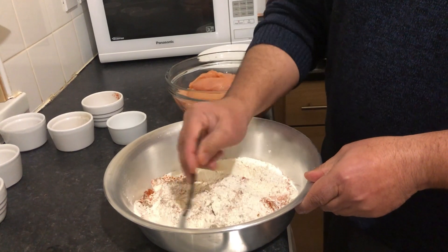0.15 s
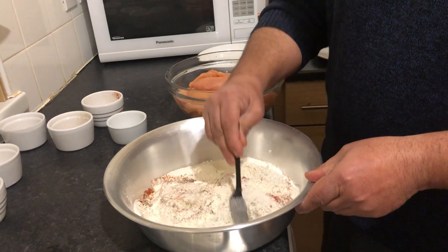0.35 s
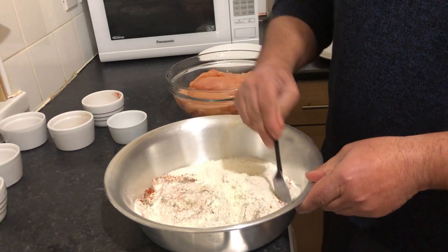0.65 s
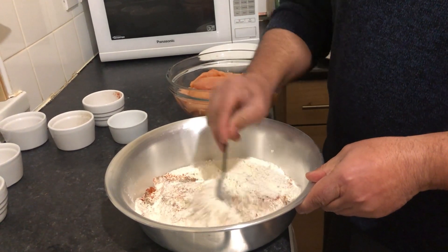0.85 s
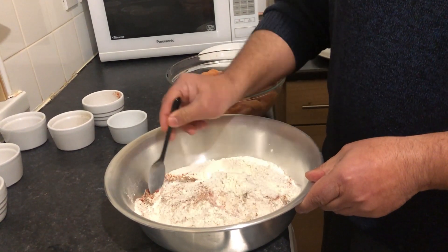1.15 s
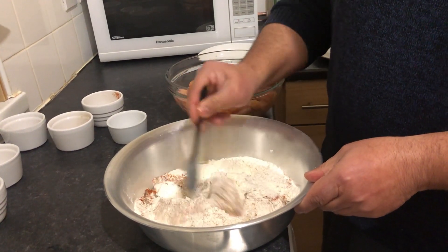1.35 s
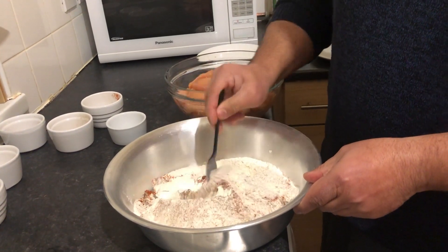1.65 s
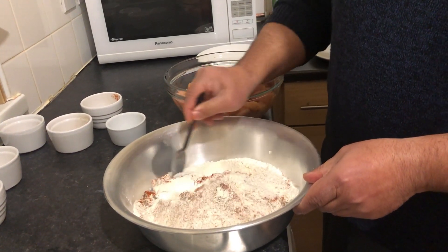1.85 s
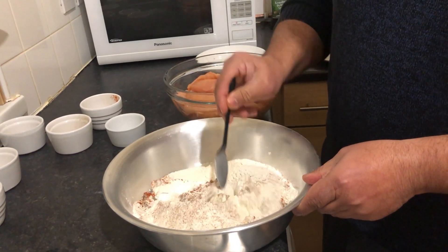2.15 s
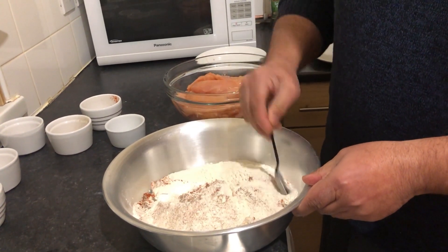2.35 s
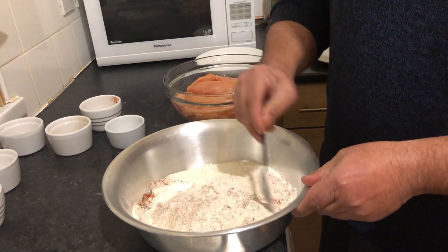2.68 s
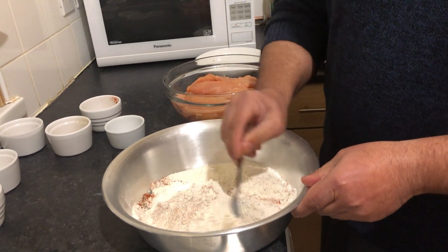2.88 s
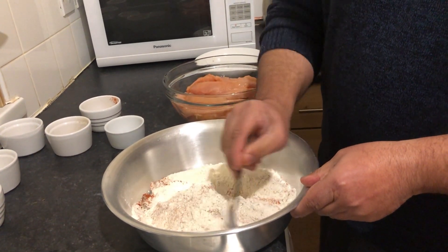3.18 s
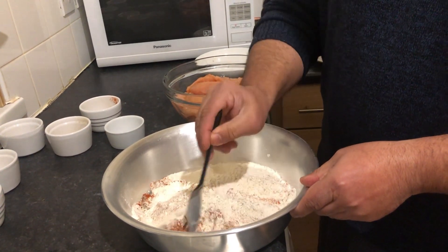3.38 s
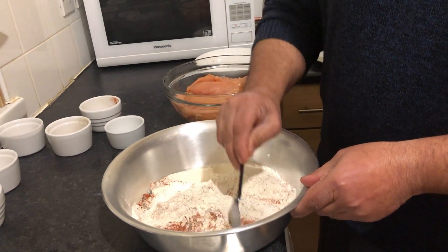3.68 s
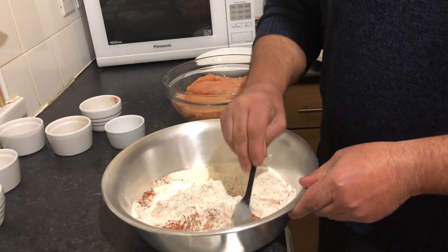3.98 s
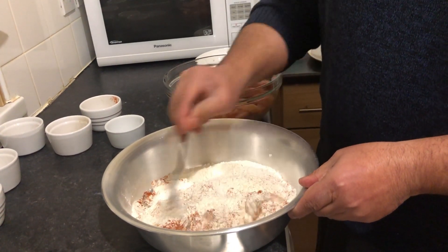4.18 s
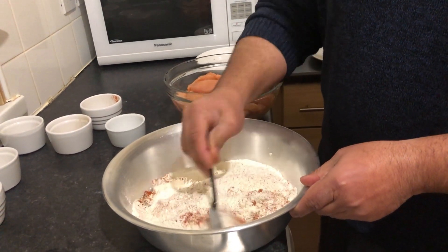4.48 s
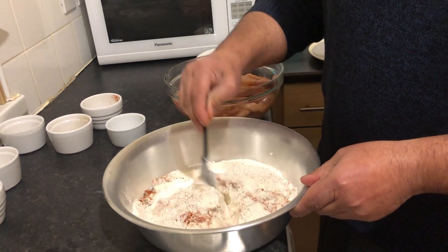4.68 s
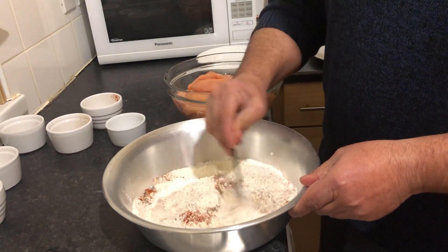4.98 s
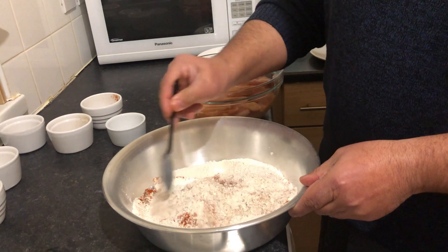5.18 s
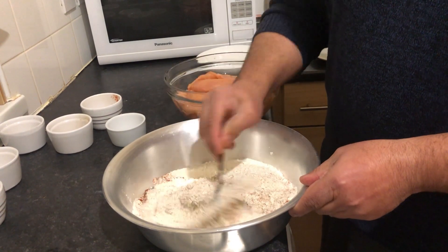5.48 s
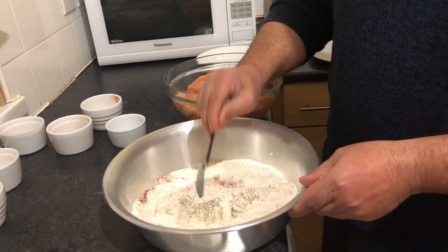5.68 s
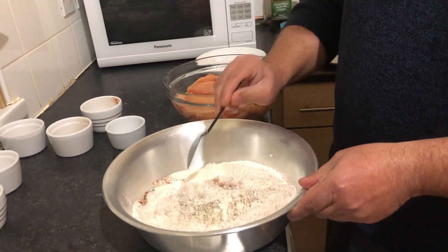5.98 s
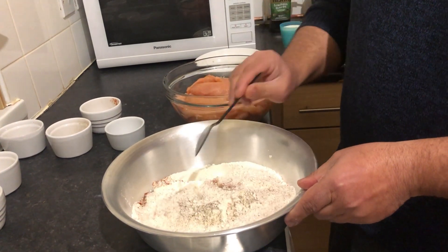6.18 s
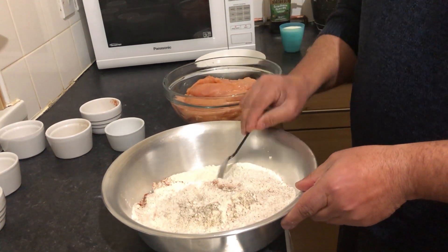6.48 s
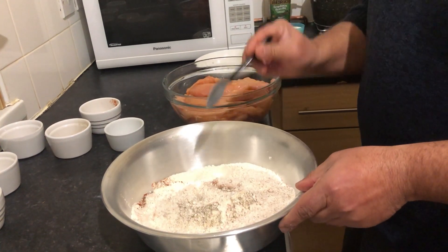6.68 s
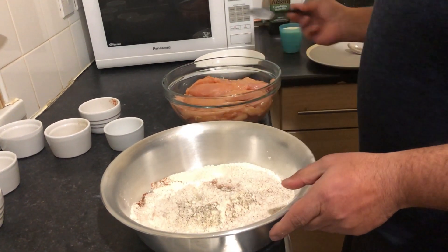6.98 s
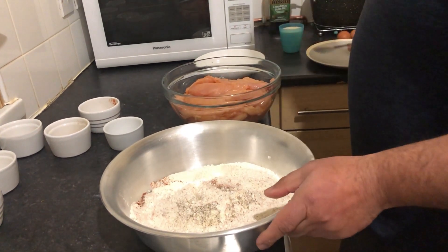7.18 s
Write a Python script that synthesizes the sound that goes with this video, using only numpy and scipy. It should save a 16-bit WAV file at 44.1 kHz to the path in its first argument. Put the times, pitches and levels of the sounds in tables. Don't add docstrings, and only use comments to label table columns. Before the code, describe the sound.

A metal spoon stirs dry flour in a steel bowl, heard close on a phone in a hard-walled kitchen. Irregular gritty digs and muffled knocks come with sandy hisses and small ticks. Brief stick-slip squeaks chirp near two seconds, a sharp clank lands at four, and after six the spoon raps bright and loud. Then it is mostly quiet, with faint scuffs. A low fridge hum fades late.

```python
import sys
import numpy as np
from scipy import signal
from scipy.fft import rfft, irfft
from scipy.io import wavfile
from scipy.ndimage import uniform_filter1d, minimum_filter1d

SR = 44100
rng = np.random.default_rng(int(sys.argv[2]) if len(sys.argv) > 2 else 0)


def makeup_ratio(level_db):
    decades = np.asarray(level_db, float) / 20
    return 10 ** decades


def dump(signal):
    limited = np.clip(np.atleast_2d(signal).T, -1, 1)
    pcm = np.round(limited * 32767).astype(np.int16)
    wavfile.write(sys.argv[1], SR, pcm)


N = 323694

# (peak time [s], rise [s], fall [s], pressure [dB], fizz [dB])
DIGS = [(0.164, 0.0043, 0.27, -47.5, -3), (0.273, .15, 0.045, -46, -9), (0.388, 0.086, 0.065, -43.5, -6.5),
        (.778, 0.036, 0.036, -39.5, -1.5), (.83, 0.04, 0.24, -50.5, -3), (1.214, 0.011, 0.046, -44.5, 13),
        (1.915, 0.029, 0.044, -49.5, -1.5), (2.465, .006, 0.089, -35.5, -11.5),
        (2.912, 0.059, 0.017, -46, -13), (3.228, .03, 0.056, -41.5, -12), (3.68, 0.1, 0.045, -43.5, -13.5),
        (3.786, 0.065, 0.011, -45, 2.5), (4.031, 0.0035, 0.026, -27, -9), (4.335, .003, 0.12, -53, -7.5),
        (4.561, 0.0045, .02, -36, -6), (4.641, 0.03, 0.017, -34, -9.5), (4.66, .02, 0.17, -56, -5),
        (4.992, 0.004, 0.038, -40.5, -5), (5.067, 0.086, 0.075, -48, -1.5),
        (5.408, 0.0028, 0.018, -28.5, -6), (5.459, 0.029, 0.15, -38, -11.5),
        (5.573, .007, .05, -39.5, -13.5), (5.985, 0.015, .017, -33.5, -10.5),
        (7.05, 0.034, 0.087, -48, -10.5)]
# (peak time [s], rise [s], fall [s], pressure [dB], fizz [dB])
SCRAPES = [(.437, 0.15, 0.0711, -38, -3.5), (0.721, 0.018, 0.044, -67.5, 10),
           (1.277, 0.017, 0.094, -41, 1.5), (1.642, 0.035, 0.041, -24.5, -12.5),
           (1.969, .06, 0.18, -32.5, -14), (2.017, 0.087, .07, -33, -10), (2.539, .1, 0.061, -51.5, -0.5),
           (2.84, 0.0055, 0.092, -28.5, -3), (3.23, 0.03, 0.023, -33, -32.5),
           (3.29, 0.0304, 0.07, -56.5, -1), (3.548, .006, 0.11, -66, 7),
           (4.021, 0.0091, 0.012, -61.5, 10.5), (3.727, .1, 0.12, -39, -5), (4.084, 0.051, .045, -34, -2),
           (4.399, 0.012, 0.1, -41, 1.5), (4.606, 0.054, 0.077, -32.5, -7), (4.91, .03, 0.066, -65, 11),
           (5.65, 0.095, 0.066, -61.5, 13), (5.796, 0.033, .04, -58, 6), (5.972, .015, .1, -60.5, 9),
           (6.215, 0.092, 0.06, -61.5, 12.5), (6.735, 0.025, 0.35, -53, -8),
           (7.262, 0.021, .04, -56.5, -12.5), (7.339, 0.0063, 0.0092, -37.5, 11.5)]
DIG_THUD_DB, SCRAPE_THUD_DB = 0.5, -26.5
SWELL_SPAN_DB = 23
ZONE_HZ, ZONE_OCTAVES_PER_DB = 2500, 0.3
# (start [s], end [s], from
# [Hz], to [Hz], level [dB])
SINGING = [(0.4, 0.448, 1860, 2460, -51.5), (1.214, 1.23, 7000, 6900, -40),
           (1.213, 1.287, 10000, 8900, -53), (1.268, 1.282, 3520, 3500, -45),
           (2.008, 2.04, 3000, 2800, -31.5), (1.944, 1.96, 1380, 1360, -48),
           (2.845, 2.885, 2270, 1930, -45), (2.839, 2.87, 4200, 3630, -45), (2.84, 2.849, 8000, 7070, -38),
           (3.226, 3.24, 1300, 930, -46.5), (7.03, 7.086, 2900, 3000, -61.5),
           (3.62, 3.777, 2350, 2035, -54.5), (4.095, 4.11, 2870, 2850, -43),
           (4.612, 4.633, 2300, 2300, -49), (1.7, 1.79, 2790, 2780, -50), (5.49, 5.53, 1310, 1310, -40),
           (6.373, 6.403, 2950, 3100, -35), (6.395, 6.45, 3020, 2900, -56), (6.378, 6.402, 1410, 1370, -30),
           (6.579, 6.631, 3100, 3100, -44)]
# (start [s], end [s], from [Hz], to [Hz], level [dB])
RUSTLING = [(4.026, 4.046, 6200, 6800, -42.5), (4.03, 4.078, 1200, 1360, -41),
            (4.056, 4.108, 2500, 3000, -43), (4.066, 4.1, 4900, 4700, -48),
            (4.062, 4.11, 6300, 6800, -50.5), (2.834, 2.849, 10200, 9500, -41),
            (2.834, 2.842, 4200, 4000, -44), (2.848, 2.89, 2560, 2560, -43),
            (2.841, 2.852, 5000, 5000, -45), (2.876, 2.885, 9000, 7900, -48),
            (4.588, 4.626, 5800, 5550, -50.5), (4.6, 4.627, 3900, 3200, -46.5),
            (1.243, 1.258, 5700, 7000, -47), (1.266, 1.288, 6300, 7800, -44.5),
            (.774, 0.791, 5500, 5500, -50.5), (4.027, 4.05, 850, 850, -40), (4.634, 4.67, 900, 900, -47),
            (6.378, 6.42, 4800, 4600, -41), (.4, .47, 4500, 5000, -53), (2.849, 2.875, 2100, 2100, -44),
            (6.378, 6.42, 2100, 2100, -36), (6.583, 6.6, 5400, 5400, -43.5),
            (6.584, 6.6, 13500, 13500, -58)]
# (time [s], peak [dB], low weight [dB], struck patch [Hz], patch ring [dB])
KNOCKS = [(0.166, -33.5, -35, 1480, -2), (0.268, -32.5, -7.5, 990, 8), (0.371, -36.5, -37, 1110, 13),
          (0.761, -44, -24, 4760, -8), (0.774, -27, -9, 1340, 26), (0.776, -35.5, -30, 4990, 22),
          (1.207, -29.5, -10, 4130, -5), (1.275, -31, -14, 3600, -12), (2.719, -58, -30, 8300, 5),
          (3.027, -46.5, -10, 9580, -3), (3.606, -38.5, 11, 951, -31), (3.782, -34, -41, 2080, -3),
          (4.335, -42, -16.5, 2900, -2), (4.395, -35, -10, 7860, 12.5), (4.558, -31.5, 6.5, 3960, -4),
          (4.6, -41, -32, 3500, -4), (4.6217, -31.5, -27, 3350, 8), (4.636, -36, -44, 3500, -10),
          (4.99, -33, -3, 1410, 6), (5.468, -20.5, -28, 1230, 21), (5.569, -25, -27.5, 2380, -9.5),
          (5.588, -32, -34, 2090, -8), (7.034, -43.5, -5, 199, 21), (7.3335, -24, -13.5, 6380, 4)]
# (time [s], peak [dB], low weight [dB], struck patch [Hz], patch ring [dB])
TICKS = [
    (1.211, -33, -16, 6840, 10),
    (1.251, -31, -32, 4260, -1),
    (1.583, -31, -1.5, 4000, -9),
    (2.461, -33, -33.5, 1730, 25),
    (2.834, -27, -30, 7510, 3),
    (2.844, -26, -11.5, 3610, 5),
    (4.58, -38, -24.5, 1468, 11.5),
    (5.407, -38.5, 13, 4674, -9),
]
KNOCK_HIGH_DB, TICK_HIGH_DB = -5.5, 3.5
# (time [s], peak [dB], struck patch [Hz], width [Hz])
SNAPS = [(.1662, -34, 5030, 1500), (0.2702, -39, 4820, 900), (.3712, -38, 3000, 1500),
         (1.2125, -27.5, 10100, 250), (1.2759, -26, 7550, 600), (1.281, -28, 9000, 900),
         (3.2332, -36, 3000, 894), (2.8345, -27, 10670, 2500), (2.8372, -30, 7460, 900),
         (6.5853, -26, 5960, 2500), (6.1798, -27.5, 8800, 2973), (7.3335, -22.5, 6100, 1506),
         (.7738, -24, 1600, 1500), (5.4695, -19, 4000, 2500), (1.9864, -16, 2970, 300),
         (2.845, -28, 4830, 497), (2.88, -31, 8000, 900), (3.6905, -35.5, 2280, 507),
         (3.7205, -47, 4870, 900), (4.0695, -32, 2620, 500), (1.2735, -30, 3600, 900),
         (4.5588, -32, 2500, 2000), (4.0992, -27.5, 2930, 301), (4.103, -36, 2800, 400),
         (4.56, -28, 1500, 900), (4.5625, -32, 4000, 600), (4.6005, -29, 2120, 500),
         (4.635, -20, 2400, 1500), (4.6369, -26.5, 2480, 302), (4.6381, -24.5, 2170, 503),
         (4.6236, -27.5, 2200, 400), (4.681, -45, 2450, 150), (4.0254, -15.5, 5750, 900),
         (4.0281, -18.5, 1500, 600), (4.0297, -24, 2400, 700), (4.0317, -21, 1190, 497),
         (4.0701, -30, 5200, 600), (6.3755, -7, 3040, 455), (6.3753, -28, 8630, 500),
         (6.384, -17.5, 1455, 200), (6.3792, -19, 4520, 400), (5.4073, -22.5, 2500, 1490),
         (5.5671, -27, 2500, 894), (5.573, -30, 4970, 910), (5.575, -30, 3000, 900),
         (5.5945, -34, 2500, 900)]
# (time [s], peak [dB], dullness [dB per octave], t60 [s])
RAPS = [
    (5.982, -29, -10.5, 0.25),
    (6.181, -20, -4.5, 0.065),
    (6.3758, -5, 0.5, 0.049),
    (6.583, -10, 0.5, 0.063),
]
# (frequency [Hz], level [dB per Hz])
RIM = [(71, -70), (120, -33), (163, -33.5), (284, -8.5), (385, -22.5), (436, -9.5), (580, -10.5), (892, -4),
       (1050, -14.5), (1400, -5), (1580, -8), (2990, -2.5), (7300, -27.5), (8700, -28.5), (11500, -38.5),
       (14700, -47), (16000, -57)]
# (time [s], peak [dB], dullness [dB per octave], t60 [s])
LANDING = (4.0253, -11, 0, .014)
# (frequency [Hz], level [dB per Hz])
BOTTOM = [(88, -48), (150, -18), (702, -12), (1190, -2), (1980, -1), (3770, -19), (5790, -9), (8560, -25),
          (10400, -22), (14000, -31), (16000, -44)]
# (time [s], level [dB], chatter rate [Hz], roughness [0-1])
SQUEAKS = [
    [(1.62, -42, 1386, 0.03), (1.626, -33, 1387, 0), (1.631, -19.5, 1380, 0.2), (1.637, -20, 1390, .3),
     (1.65, -30, 1398, 0.3)],
    [(1.9585, -21, 1340, 0.07), (1.963, -18, 1353, 0.11), (1.974, -12.5, 1347, 0),
     (1.982, -11.5, 1389, 0.1), (1.987, -17, 1471, 0.58), (1.996, -26, 1456, 0.34)],
    [(5.448, -40, 1260, 0.27), (5.457, -25.5, 1271, 0), (5.462, -25, 1283, 0.4), (5.468, -30.5, 1305, 0.82),
     (5.484, -34, 1326, 0.57)],
]
# (multiple [1], level [dB])
OVERTONES = [
    [(1, -8), (2, 3), (3, -1), (4, -7.5), (5, -7), (6, -8), (7, -11), (8, -19), (9, -30), (10, -36)],
    [(1, -5.5), (2, 1), (3, -3.5), (4, -8), (5, -7.5), (6, 0), (7, -5.5), (8, -20), (9, -21), (10, -29)],
    [(1, 12), (2, 11.5), (3, 3.5), (4, 5), (5, 4.5), (6, 3), (7, 2), (8, -4), (9, -34.5), (10, -15)],
]
# (frequency [Hz], width [Hz], level [dB])
BOWL = [(1005, 8.6, 7), (1437, 17, 5.5), (1700, 19, -5.5), (2292, 260, -8), (3056, 11, -10),
        (3400, 14, -22), (3930, 12, -18), (4198, 22, -18), (4400, 21, -22.5), (9260, 120, -26.5),
        (9400, 73, -33), (11660, 46, -38.5)]
# (frequency [Hz], t60 [s])
WALLS = [(200, 0.31), (1000, 0.42), (3000, 0.35), (6000, 0.38), (8500, .28), (12000, 0.2)]
# (time [s], level [dB])
BUMPS = [(.22, -58), (.8, -51), (1.35, -52), (1.68, -80), (1.96, -67), (2.21, -79), (2.51, -69.5),
         (3.66, -62.5), (4.09, -56), (5.03, -49), (5.5, -50), (6.44, -59.5), (6.81, -69.5), (6.9, -66),
         (7.05, -58)]
BUMP_RISE_S, BUMP_FALL_S, TREMBLE_DB = 0.062, 0.087, -81
# (frequency [Hz], level [dB])
FRIDGE = [(100, -54.5), (203, -71.5), (242, -70.5), (303, -71), (424, -65)]
# (time [s], level [dB])
FRIDGE_ON = [
    (0, 0.5),
    (6.301, 1),
    (6.45, -8.5),
    (7.34, -9.5),
]
# (frequency [Hz], level [dB per Hz])
AIR = [(15, -80), (25, -44), (64, -21.5), (78, -13.5), (97, -16), (114, -31), (130, -14), (416, -22.5),
       (476, -23), (863, -31), (936, -32), (1330, -33), (1740, -38.5), (5280, -46.5), (16000, -50.5)]
AIR_DB = -58
# (centre [s], length [s], untouched up to [Hz], depth [dB], lines kept [count])
THINNED = [(0.041, 0.018, 1990, -24, 5), (0.292, 0.011, 890, -9, 9), (0.534, 0.013, 1200, -13, 6),
           (1.194, 0.017, 2170, -38, 1), (1.302, 0.005, 910, -13, 9), (1.922, 0.031, 790, -4, 8),
           (2.854, 0.013, 400, -25, 14), (2.956, 0.028, 900, -36, 8), (3.226, 0.014, 1700, -15, 9),
           (3.268, 0.012, 895, -10, 8), (3.494, 0.034, 1215, -41, 8), (3.947, 0.016, 2500, -25.5, 3),
           (4.503, 0.0097, 2390, -23, 3), (4.648, 0.015, 440, -30, 12), (4.779, 0.019, 1500, -14, 5),
           (4.844, 0.011, 2804, -26, 4), (4.927, 0.0087, 1500, -5, 6), (5.25, 0.017, 2000, -28, 4),
           (5.415, .011, 1495, -39.5, 6), (6.167, 0.015, 1130, -41, 2), (6.252, 0.011, 3800, -22, 2),
           (6.369, .005, 4500, -25.5, 1), (6.546, 0.034, 4900, -40, 1), (6.531, 0.014, 500, -6, 7),
           (6.803, 0.014, 1520, -17, 10), (6.955, 0.014, 2590, -16, 3), (7.016, 0.0049, 1800, -17, 4)]


def strokes():
    rows = np.array(DIGS + SCRAPES)
    fizz_db = rows[:, 4]
    power = np.array([swell(*row[:4]) for row in rows])
    thud_db = np.repeat([DIG_THUD_DB, SCRAPE_THUD_DB], [len(DIGS), len(SCRAPES)])
    stroke_hz = ZONE_HZ * 2 ** (ZONE_OCTAVES_PER_DB * fizz_db)
    zone_hz = heard(np.square(stroke_hz) @ power / power.sum(0))
    size = makeup_ratio(1.1 * np.minimum(rng.exponential(1, N), 5))
    clumps = makeup_ratio(1.2 * evened(uniform_filter1d(rng.standard_normal(N), 250)))
    grains = size * clumps * rng.standard_normal(N)
    grit = patchy(grains, 3.2)
    thud, mid, fizz = three_bands(grit)
    wall = evened(resonate(grit, zone_hz, 600)) + 0.8 * evened(resonate(grit, 3.6 * zone_hz, 640))
    body = above(0.54 * mid + 0.34 * wall + 0.43 * bowl(grit, 71), 1000)
    sound = heard(makeup_ratio(2 * thud_db) @ power) * thud
    sound += heard(power.sum(0)) * body
    sound += heard(makeup_ratio(2 * fizz_db) @ power) * fizz
    return makeup_ratio(-7.0) * sound, singing(grains, SINGING, 187) + singing(grains, RUSTLING, 690)


def singing(grains, rows, width_hz):
    out = np.zeros(N)
    for start, end, from_hz, to_hz, db in rows:
        part = grains[round(start * SR):round(end * SR)]
        hz = np.geomspace(from_hz, to_hz, len(part))
        line = resonate(resonate(part, hz, width_hz), hz, 4 * width_hz)
        add(out, start, makeup_ratio(db) * evened(line) * signal.windows.tukey(len(part), .3))
    return out


def knock(db, low_db, ring_hz, ring_db, high_db, chance):
    low, mid, high = three_bands(burst(chance, .05, .0026))
    crack = evened(makeup_ratio(low_db) * low + mid + makeup_ratio(high_db) * high)
    patch = evened(resonate(crack, ring_hz, 98))
    return peaked(crack + makeup_ratio(ring_db) * patch + 0.18 * bowl(crack, 140), db)


def snap(db, hz, width_hz):
    click = np.zeros(600)
    click[8] = 1
    ring = resonate(resonate(click, hz, width_hz), hz, 5.6 * width_hz)
    broad = above(signal.lfilter([.6], [1, -.4], click), 900)
    return peaked(ring / abs(ring).max() + 0.31 * broad, db)


def rap(db, dull_db, t60, chance, spectrum, click, crack_s, ring):
    hz = abs(np.fft.fftfreq(4096, 1 / SR))
    gain_db = np.maximum(read(spectrum, hz) + dull_db * np.log2((hz + 50) / 2000), -70)
    minimum_phase = np.exp(np.conj(signal.hilbert(np.log(makeup_ratio(gain_db)))))
    colour = np.fft.ifft(minimum_phase).real[:2048]
    blow = burst(chance, t60, crack_s)
    blow[0] += click
    z = rfft(blow)
    blow = irfft(z / uniform_filter1d(abs(z), size=41))[:4000]
    crack = evened(signal.fftconvolve(blow, colour))
    return peaked(crack + ring * bowl(crack, 75), db)


def squeak(rows, overtones):
    s, (db, hz, rough) = unpack(rows)
    n = len(hz)
    rough = np.clip(rough, .05, 1)
    jitter = evened(uniform_filter1d(rng.standard_normal(n), 60))
    turns = np.cumsum(hz * (1 + 0.07 * rough * jitter)) / SR
    flutter = uniform_filter1d(rng.standard_normal((len(overtones), n)), 130, 1)
    bright_db = .06 * (db - db.max())
    tone = np.zeros(n)
    for (k, overtone_db), wander in zip(overtones, flutter):
        phase = k * turns + .5 + .55 * rng.random() + 0.016 * k * evened(wander[::-1])
        level = makeup_ratio(overtone_db + k * bright_db + 3 * evened(wander))
        tone += level * np.cos(2 * np.pi * phase)
    _, mid, high = three_bands(np.exp(-(turns % 1) / 0.19) * rng.standard_normal(n))
    chatter = evened(tone) + (.17 + .45 * rough) * (mid + .5 * high)
    sound = np.pad(makeup_ratio(db) * chatter * signal.windows.tukey(n, .2), (0, 5000))
    return s, above(sound + 2.8 * resonate(sound, hz[-1], 50), 1600)


def burst(chance, t60, crack_s):
    t = np.arange(len(chance)) / SR
    rattle = chance[::-1] * makeup_ratio(-60 * t / np.clip(t60, .01, .3))
    return chance * np.exp(-t / crack_s) + 0.23 * rattle


def bowl(x, damping_hz):
    return evened(sum(makeup_ratio(db) * resonate(x, hz, width + damping_hz) for hz, width, db in BOWL))


def resonate(x, hz, width_hz):
    turn = np.exp(2j * np.pi * np.cumsum(hz * np.ones(len(x))) / SR)
    r = np.exp(-np.pi * width_hz / SR)
    return 2 * (turn * signal.lfilter([1 - r], [1, -r], x / turn + 1e-18)).real


def patchy(x, patchy_db):
    z = signal.stft(x, SR, nperseg=256, noverlap=192)[2]
    blotches = uniform_filter1d(uniform_filter1d(rng.standard_normal(z.shape), 5, 0), 9, 1)
    return signal.istft(z * makeup_ratio(patchy_db * evened(blotches)), SR, nperseg=256, noverlap=192)[1][:len(x)]


def three_bands(x):
    bands = []
    for order, edges_hz in (2, [170, 1200]), (2, [1200, 1.227 * 5500]), (1, [5500, 12000]):
        sos = signal.butter(order, edges_hz, "band", fs=SR, output="sos")
        bands.append(evened(signal.sosfilt(sos, x)))
    return bands


def above(x, hz):
    return signal.sosfilt(signal.butter(3, hz, "high", fs=SR, output="sos"), x)


def evened(x):
    return x / np.sqrt(np.mean(x ** 2) + 1e-20)


def peaked(x, db):
    return makeup_ratio(db) * x / abs(x).max()


def read(points, hz):
    f, value = np.transpose(points)
    return np.interp(np.log(hz + 1), np.log(f + 1), value)


def unpack(rows):
    s, *columns = np.transpose(rows)
    t = np.arange(s[0], s[-1], 1 / SR)
    return s[0], [np.interp(t, s, c) for c in columns]


def swell(s, rise_s, fall_s, db):
    t = np.arange(0, N + 22, 22) / SR - s
    away = np.maximum(-t / max(rise_s, .002), t / max(fall_s, .004))
    return makeup_ratio(2 * np.maximum(db - SWELL_SPAN_DB * away, -140))


def heard(power):
    return np.interp(np.arange(N) / 22, np.arange(len(power)), np.sqrt(power))


def add(mix, s, sound):
    part = mix[round(s * SR):][:len(sound)]
    part += sound[:len(part)]


def kitchen(x):
    taps = np.zeros(SR // 2)
    at = np.arange(120, len(taps) - 12, 12)
    taps[at + rng.integers(0, 12, len(at))] = rng.choice([-1., 1.], len(at))
    hz, t, z = signal.stft(taps, SR, nperseg=128)
    tail = signal.istft(z * makeup_ratio(-60 * t / read(WALLS, hz)[:, None]), SR, nperseg=128)[1]
    return signal.fftconvolve(x, tail / np.linalg.norm(tail))[:N]


def shake():
    rumble = evened(resonate(resonate(rng.standard_normal(N), 50, 25), 50, 25))
    bumps = sum(swell(s, BUMP_RISE_S, BUMP_FALL_S, db) for s, db in BUMPS)
    return rumble * heard(makeup_ratio(2 * TREMBLE_DB) + bumps)


def fridge():
    t = np.arange(N) / SR
    waver = evened(uniform_filter1d(rng.standard_normal(N), 9000))
    turned_s = np.cumsum(1 + 0.0052 * waver) / SR
    hum = sum(makeup_ratio(db) * np.sqrt(2) * np.sin(2 * np.pi * hz * turned_s) for hz, db in FRIDGE)
    motor = makeup_ratio(-57.0) * evened(resonate(resonate(rng.standard_normal(N), 90, 17), 90, 17))
    return (hum + motor) * makeup_ratio(np.interp(t, *np.transpose(FRIDGE_ON)))


def room_air():
    frames, hz = N // 512 + 5, np.fft.rfftfreq(2048, 1 / SR)
    a, b, patches = rng.standard_normal((frames, 1025, 3)).T
    patches = evened(uniform_filter1d(uniform_filter1d(patches, 12, 0), 8, 1))
    z = (a + 1j * b) * makeup_ratio(read(AIR, hz)[:, None] + patches)
    return makeup_ratio(AIR_DB) * evened(signal.istft(z, nperseg=2048, noverlap=1536)[1][:N])


def scene():
    spoon, edge, landing = np.zeros((3, N))
    grit, sung = strokes()
    for rows, high_db in (KNOCKS, KNOCK_HIGH_DB), (TICKS, TICK_HIGH_DB):
        for s, *settings in rows:
            add(spoon, s, knock(*settings, high_db, rng.standard_normal(6000)))
    for s, *settings in SNAPS:
        add(spoon, s, snap(*settings))
    for s, *settings in RAPS:
        add(spoon, s, rap(*settings, rng.standard_normal(6000), RIM, click=2.5, crack_s=.003, ring=.35))
    s, *settings = LANDING
    add(landing, s, rap(*settings, rng.standard_normal(6000), BOTTOM, click=5, crack_s=.001, ring=.06))
    add(landing, s + .0004, snap(-8, 1800, 730))
    for rows, overtones in zip(SQUEAKS, OVERTONES):
        add(edge, *squeak(rows, overtones))
    spoon = spoon + grit
    tail = kitchen(makeup_ratio(-7.5) * spoon + makeup_ratio(-14) * sung + makeup_ratio(-9.5) * edge + makeup_ratio(-18.0) * landing)
    tail = above(patchy(tail, 1.0), 130)
    return (spoon + sung + edge + landing + tail + room_air() + fridge() + shake())[None]


def thin(x):
    out, hz = x.copy(), np.fft.rfftfreq(2048, 1 / SR)
    for s, length, clean_hz, depth_db, kept in THINNED:
        at = round(s * SR) + np.arange(-1024, 1024)
        late = at / SR - s
        before = np.exp(-((late + length / 2) / (0.5 * length)) ** 2)
        z = rfft(x[at] * before) * (hz > clean_hz)
        is_peak = abs(z) >= -minimum_filter1d(-abs(z), size=25)
        rank = abs(z) * (hz / 1000) ** .03 * is_peak
        lines = irfft(z * (rank >= np.sort(rank)[-kept]))
        upper = irfft(rfft(x[at]) * (hz > clean_hz))
        gap = np.clip((length / 2 - abs(late)) / .003 + .5, 0, 1)
        hold = np.clip(np.minimum((length / 2 + late) / 0.002, (length / 2 - late) / 0.015) + 1, 0, 1)
        out[at] -= gap * (1 - makeup_ratio(depth_db)) * upper
        out[at] += hold * makeup_ratio(10.0) * lines
    return out


def band_limit(x):
    return signal.sosfilt(signal.butter(12, 16670, fs=SR, output="sos"), x)


def record(dry):
    limited = signal.oaconvolve(thin(dry[0]), signal.firwin(255, 15650, fs=SR), "same")
    return band_limit(limited[None])


dry = scene()
out = record(dry)
dump(out)
```